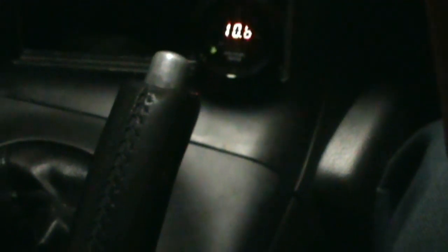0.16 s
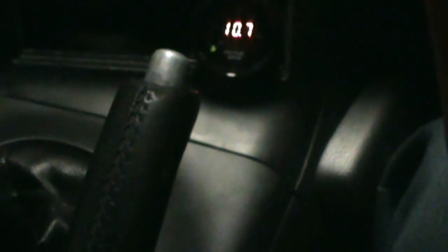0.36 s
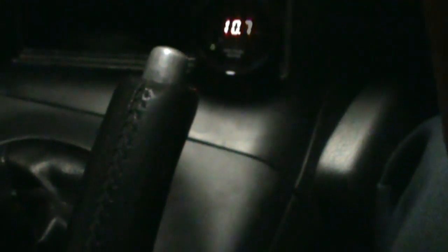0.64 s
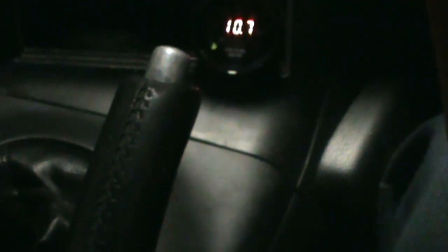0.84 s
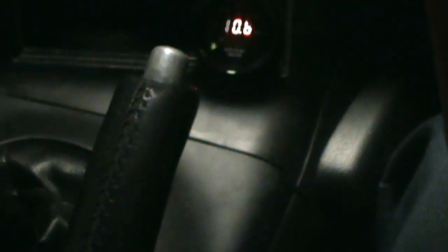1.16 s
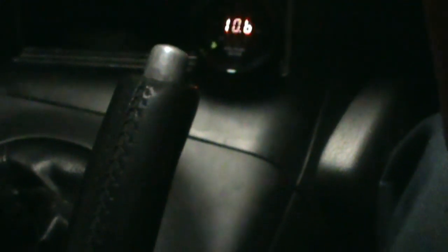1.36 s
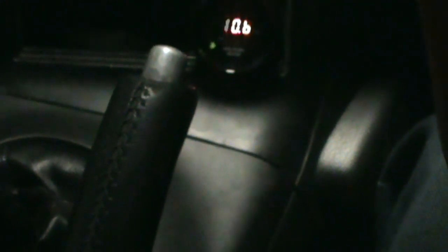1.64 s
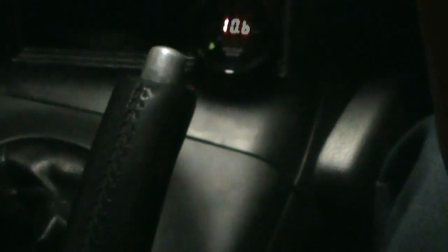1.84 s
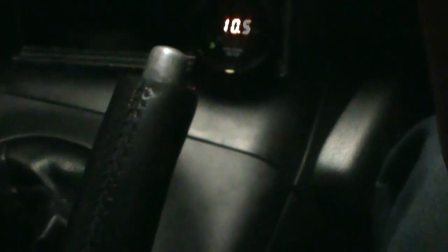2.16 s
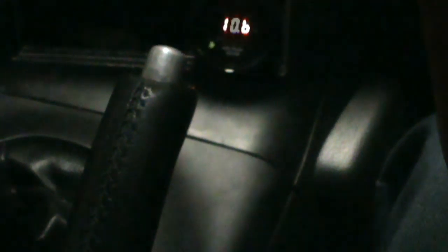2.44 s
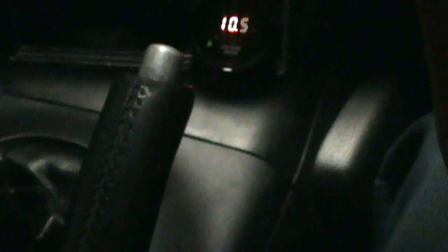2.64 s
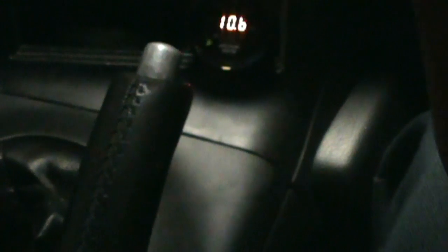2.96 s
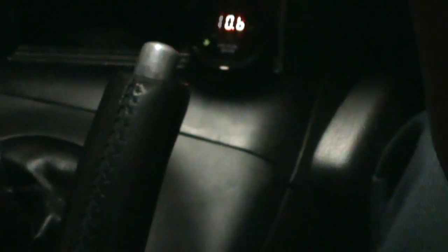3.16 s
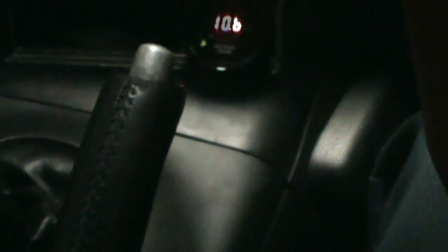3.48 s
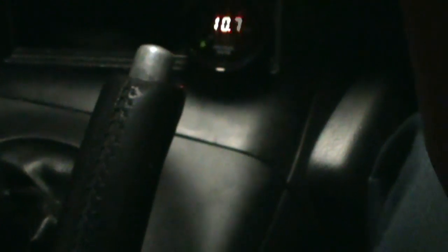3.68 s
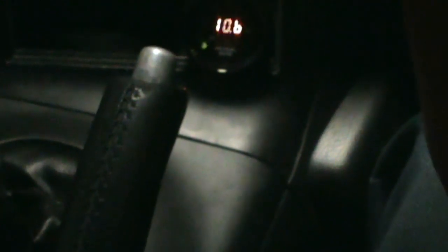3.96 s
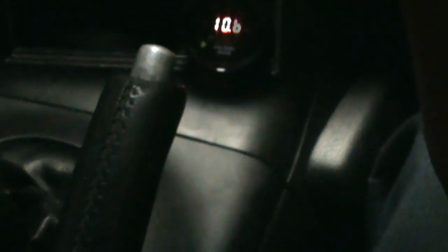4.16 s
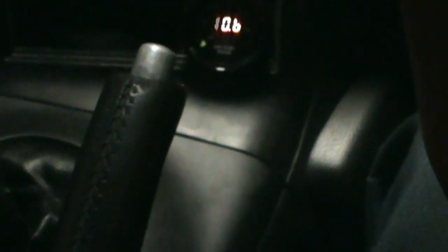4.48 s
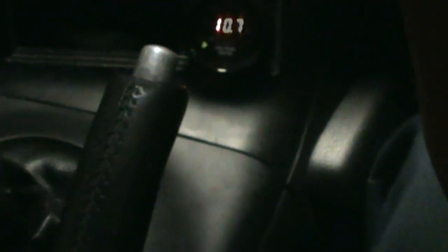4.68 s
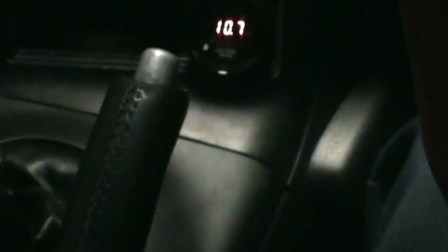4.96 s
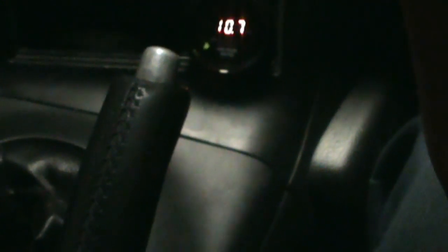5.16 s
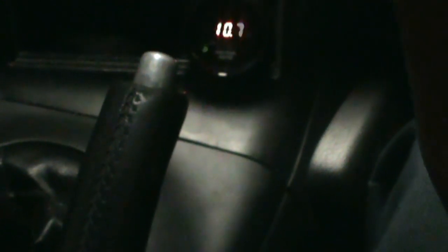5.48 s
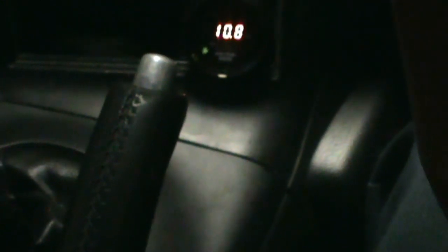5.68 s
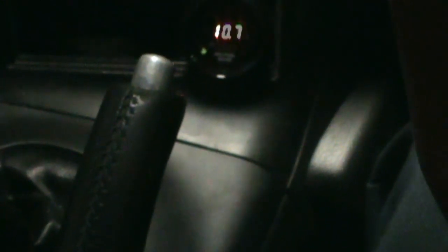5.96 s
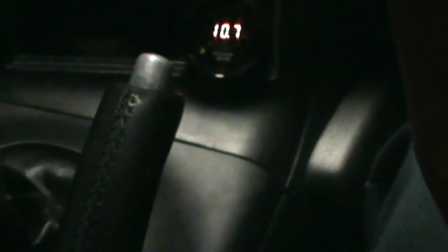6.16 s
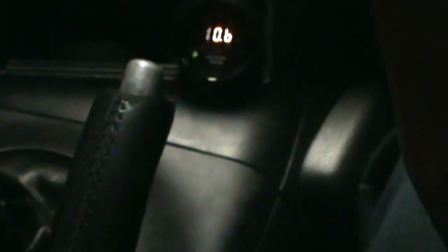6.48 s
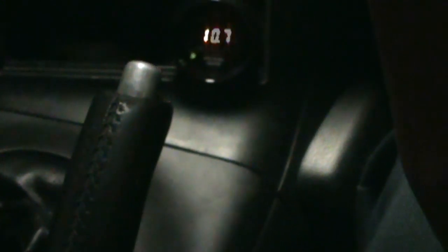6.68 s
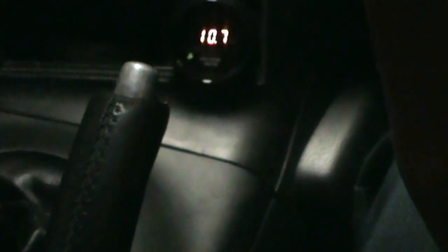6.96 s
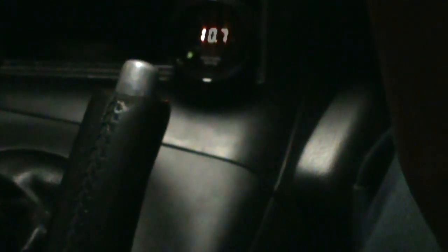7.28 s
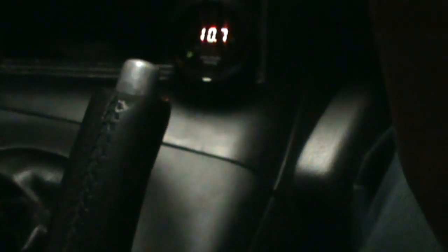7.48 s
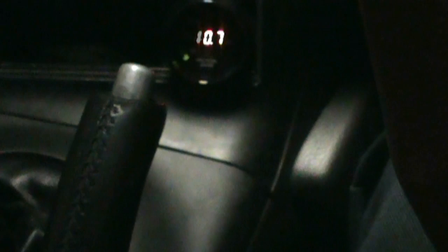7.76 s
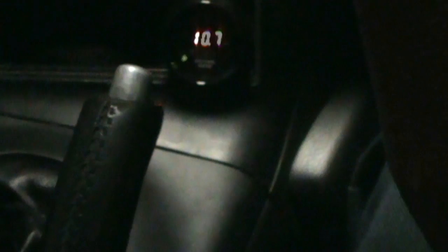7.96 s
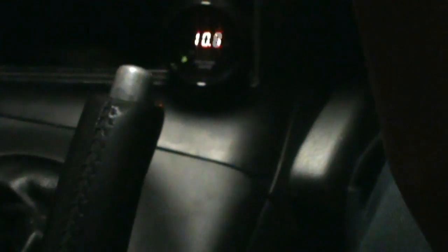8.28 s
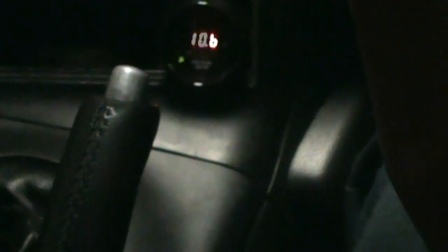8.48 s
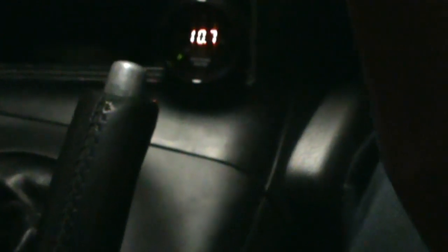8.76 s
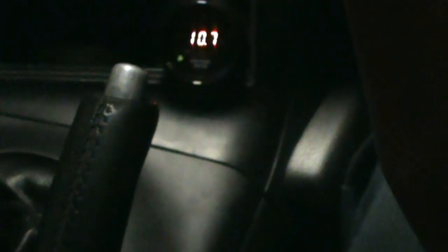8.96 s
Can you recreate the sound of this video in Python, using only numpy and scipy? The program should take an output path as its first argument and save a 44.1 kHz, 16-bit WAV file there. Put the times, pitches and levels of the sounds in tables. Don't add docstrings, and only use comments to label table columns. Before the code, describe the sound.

Inside a parked car, a low booming idle throbs roughly and continuously, with soft air noise, trim buzz and small irregular plastic clicks.

```python
import sys
import numpy as np
from scipy import signal
from scipy.fft import rfft, irfft, next_fast_len
from scipy.io import wavfile
from scipy.ndimage import uniform_filter1d, map_coordinates

SR = 44100
rng = np.random.default_rng(int(sys.argv[2]) if len(sys.argv) > 2 else 0)


def boost_factor(decibels):
    exponent = np.asarray(decibels, float) / 20
    return 10 ** exponent


def int16_out(signal):
    q = np.round(np.clip(np.atleast_2d(signal).T, -1, 1) * 32767)
    wavfile.write(sys.argv[1], SR, q.astype(np.int16))


N = 402191
PAD = next_fast_len(N + 16384)
HZ = np.fft.rfftfreq(PAD, 1 / SR)

# (frequency [Hz], level [dB per Hz])
RUSH_SPECTRUM = [(200, -37), (330, 2.5), (450, 1.5), (560, -5), (850, -5.5), (1090, -14), (1300, -12.5),
                 (1550, -18.5), (2000, -19), (2300, -25.5), (3420, -27), (7500, -31), (12000, -33.5),
                 (15700, -40)]
# (frequency [Hz], width [Hz], level over the rush [dB])
TRIM_PANELS = [(1030, 40, 3), (1200, 20, 4), (1270, 40, 3), (1440, 20, 6), (1680, 50, 3), (1943, 18, 6),
               (2140, 50, 3), (2443, 40, 4), (2660, 25, 5), (2706, 22, 7), (2755, 25, 6), (2905, 20, 4),
               (3050, 60, 4), (4135, 15, 5), (4697, 30, 8), (4965, 25, 6), (6330, 30, 4), (6960, 200, 3),
               (10900, 300, 2)]
# (frequency [Hz], left over right [dB])
CABIN_PAN = [(300, 1.6), (1300, 2), (4400, .5), (15000, 0.22)]
# (frequency [Hz], left lead [rad])
CABIN_LEAD = [(300, 0.81), (950, 0.29), (1300, 0.16), (15000, 0.33)]


def unit(x):
    return x / np.sqrt(np.mean(x ** 2) + 1e-20)


def along(points, hz):
    f, v = np.transpose(points)
    return np.interp(np.log(hz + 1), np.log(f + 1), v)


def causal(db):
    ceps = irfft(np.log(boost_factor(db) + 1e-6), PAD)
    ceps[1:PAD // 2] *= 2
    ceps[PAD // 2 + 1:] = 0
    return np.exp(rfft(ceps))


def wobble(rate):
    return map_coordinates(rng.standard_normal(int(N * rate / SR) + 4), [np.arange(N) * rate / SR])


def ports(pair, colour, alike, pan, lead):
    turn = np.arccos(np.clip(alike, -1, 1)) / 2
    shared, opposed = rfft(pair, PAD) * colour * [np.cos(turn) + 0 * HZ, np.sin(turn) + 0 * HZ]
    tilt = boost_factor(along(pan, HZ) / 2) * np.exp(.5j * along(lead, HZ))
    left, right = (shared + opposed) * tilt, (shared - opposed) / tilt
    return unit(irfft(np.array([left, right]), PAD)[:, :N])


def shaft():
    # (time [s], shaft
    speed_path = [(0, 24.65), (1.25, 24.68), (1.42, 24.62), (1.82, 24.99), (2.12, 24.71), (3.62, 24.7),
                  (3.72, 24.85), (4.08, 24.88), (4.85, 24.63), (6.9, 24.83), (7.06, 25.06), (7.35, 24.79),
                  (8.41, 24.99), (8.76, 24.77), (9.12, 24.83)]
    # (time [s], speed change [Hz])
    stumbles = [
        (0.42, -0.22),
        (0.79, 0.17),
        (1.28, -0.14),
        (2.56, -0.21),
        (2.87, 0.15),
        (3.32, -0.27),
        (5.02, -0.1),
        (5.37, 0.08),
        (5.7, -0.3),
    ]
    stumble_s, idle_hz, start_turn = 0.063, 24.73, -0.24
    t = np.arange(N) / SR
    hz = np.interp(t, *np.transpose(speed_path))
    for s, change_hz in stumbles:
        u = np.maximum(t - s, 0) / stumble_s
        hz = hz + change_hz * u * np.exp(1 - u)
    hz = hz - 0.007
    turns = start_turn + np.cumsum(hz + 0.03 * wobble(12)) / SR
    return turns, uniform_filter1d(hz, size=6000) - idle_hz


def hum(turns, over_hz, orders, flanks, cycle_hz, odd_lag):
    # (frequency [Hz], width [Hz])
    chambers = [(121, 53.6), (158, 48.5), (391, 10.2)]
    out = np.zeros((2, N))
    swells = {}
    for k, left, right, away in flanks:
        swells[k] = np.outer([left, right], over_hz) + away * np.abs(over_hz)
    for k, left_db, right_db, lead in orders:
        hz = k * cycle_hz
        left_swell, right_swell = swells.get(k, (0, 0))
        lag = sum(2 * np.arctan2(hz * w, c * c - hz * hz) for c, w in chambers)
        lag += odd_lag * (k % 2)
        angle = 2 * np.pi * k * turns - lag
        out[0] -= boost_factor(left_db + left_swell) * np.cos(angle + lead)
        out[1] -= boost_factor(right_db + right_swell) * np.cos(angle)
    return np.sqrt(2) * out


def engine_hum(turns, over_hz):
    # (multiple, left level [dB], right level [dB], left lead [rad])
    orders = [(1, -37.7, -37.4, -0.1), (2, -26.1, -23.0, 0.1), (3, -38.1, -36.9, 0.2),
              (4, -23.6, -14.3, 0.5), (5, -34.0, -28.4, 0.8), (6, -40.3, -29.0, -0.8),
              (7, -37.2, -37.0, 2.0), (8, -25.4, -24.1, 1.1), (9, -32.0, -34.6, 0.7),
              (10, -20.8, -19.9, 0.8), (11, -36.8, -34.6, 0.9), (12, -30.4, -33.4, 0.7),
              (13, -40.0, -45.1, 1.7), (14, -41.9, -43.0, 1.8), (15, -51.7, -49.8, 1.5),
              (16, -41.0, -44.1, 0.3), (17, -50.6, -49.0, 1.3), (18, -50.6, -51.2, -0.1),
              (21, -62.0, -56.3, 1.3), (22, -61.8, -57.7, 0.9), (24, -51.4, -47.6, 0.2),
              (25, -57.0, -56.9, 1.1), (26, -58.2, -56.3, 1.8), (27, -58.4, -57.5, 0.5),
              (28, -63.6, -60.7, 1.1), (29, -57.4, -60.2, 0.6), (30, -61.0, -64.0, 0.9),
              (32, -60.1, -63.6, 1.1), (35, -59.9, -62.7, 0.4), (36, -62.0, -65.9, 0.6)]
    # (multiple, left slope [dB per Hz], right slope [dB per Hz], rise away from idle [dB per Hz])
    flanks = [(2, 1.3, 2, 0), (4, 9, 5.5, 0), (5, 2.7, 1.7, 0), (6, -12, 4, 14), (7, 3, -15, 0),
              (8, -12, -8, 0), (9, 4, 7, 0), (10, -1.4, -2, 0), (11, -12, -4, 0), (12, 3, 9, 0),
              (14, -9, -10, 0), (15, -30, -5, 0), (16, -11, -19, 0), (24, -8, -9, 0)]
    return hum(turns, over_hz, orders, flanks, 24.554, odd_lag=1.22)


def burble(turns, over_hz):
    # (frequency [Hz], level [dB per Hz])
    thump = [(10, -13), (37, -11), (61, 2), (86, 1.5), (136, 5), (165, 8), (235, 4), (284, -11.5), (310, 7),
             (360, -19.5), (460, -10), (560, -26), (800, -37), (1500, -59)]
    # (frequency [Hz], left over right [dB])
    thump_pan = [(40, -3), (61, -27), (136, -9), (210, 12.5), (260, -27.5), (310, 1.5), (600, -4)]
    # (frequency [Hz], left lead [rad])
    thump_lead = [(40, .1), (110, 0.7), (200, 1.58), (300, 0.64), (900, 0.73)]
    faces = [1.5, -0.45, -1, 0.5, 0.35, -0.3]
    uneven_db_per_hz = 15
    fired = np.flatnonzero(np.diff(np.floor(2 * turns)))
    unevenness_db = uneven_db_per_hz * np.abs(over_hz[fired, None]) * [1, 1, 0, 1]
    size = rng.standard_normal((len(fired), 4)) * boost_factor(unevenness_db)
    pair = 0.0041 * rng.standard_normal((2, N))
    pair[:, fired] += (size[:, :2] * boost_factor(0.5 * size[:, 2:3])).T
    pair[0, fired] += np.resize(faces, len(fired))
    pair[0, np.minimum(fired + 310, N - 1)] += 0.84 * size[:, 3]
    return boost_factor(-31.0) * ports(pair, causal(along(thump, HZ)), 0.73, thump_pan, thump_lead)


def pump_hum(turns, over_hz):
    # (multiple, left level [dB], right level [dB], left lead [rad])
    orders = [(1, -44.1, -40.4, 0.1), (2, -45.6, -46.4, 0.9), (4, -39.9, -35.0, -0.2),
              (5, -48.3, -48.5, 0.2), (7, -52.2, -49.6, 0.9), (8, -57.1, -64.3, 1.3),
              (10, -62.2, -70.6, 2.4), (11, -47.8, -54.7, 0.6), (14, -65.9, -66.3, 0.1),
              (17, -70.6, -82.0, 0.4), (19, -68.4, -68.1, 0.3)]
    # (multiple, left slope [dB per Hz], right slope [dB per Hz], rise away from idle [dB per Hz])
    flanks = [(1, -16, -17, 0), (2, -8, -3, 0), (5, 10, 6, 0), (11, 1, -21, 0)]
    strokes = turns * 8 / 3
    return hum(strokes + 0.34, over_hz, orders, flanks, 62, odd_lag=0.75)


def rush(turns):
    # (time [s], level [dB])
    air = [(0.0, -59.5), (1.57, -60.5), (1.67, -60), (5.99, -60.5), (9.12, -61)]
    # (frequency [Hz], likeness [0-1])
    likeness = [(300, 1), (800, 0.4), (1500, 0.71), (4000, 0.55), (15000, 0.57)]
    z = signal.stft(rng.standard_normal((2, N)), nperseg=512)[2]
    field = uniform_filter1d(rng.standard_normal(z.shape[1:]), size=5, axis=0)
    field = uniform_filter1d(field, size=8, axis=1)
    pair = signal.istft(z * boost_factor(0.56 * unit(field)), nperseg=512)[1][:, :N]
    firing_db = 0.9 * np.cos(4 * np.pi * turns + 2.0)
    rotor_db = 0.59 * np.cos(2 * np.pi * turns + 1.4)
    beat_db = firing_db + rotor_db + 0.32 * wobble(14) + 0.6 * wobble(40)
    buzz_db = sum(db / (1 + (2 * (HZ - hz) / width) ** 2) for hz, width, db in TRIM_PANELS)
    ripple = map_coordinates(rng.standard_normal(1400), [HZ / 18])
    modes_db = 1.26 * ripple / (1 + HZ / 9000)
    air_db = np.interp(np.arange(N) / SR, *np.transpose(air))
    colour = boost_factor(along(RUSH_SPECTRUM, HZ) + buzz_db + modes_db)
    noise = ports(pair * boost_factor(beat_db), colour, along(likeness, HZ), CABIN_PAN, CABIN_LEAD)
    return boost_factor(air_db + 21.5) * noise


def rattle(turns):
    fired = np.flatnonzero(np.diff(np.floor(2 * turns + .6)))
    chance = rng.standard_normal((len(fired), 3))
    tapped = np.clip(fired + (1.5 * chance[:, 0]).astype(int), 0, N - 1)
    tap_db = 2.5 * chance[:, 1:].T + 3 * wobble(7)[fired]
    taps = np.zeros((2, N))
    taps[:, tapped] = boost_factor(np.minimum(tap_db, 6))
    panels = 0
    for hz, w, db in TRIM_PANELS:
        resonance = 1j * HZ * w / (hz * hz - HZ * HZ + 1j * HZ * w)
        panels = panels + boost_factor(along(RUSH_SPECTRUM, hz) + db) * resonance
    return boost_factor(-58) * ports(taps, panels, 0.87, CABIN_PAN, CABIN_LEAD)


def whine():
    # (frequency [Hz], level [dB rms])
    tones = [(9805, -83), (11834, -88), (15675, -90), (15734, -79)]
    t = np.arange(N) / SR
    return sum(np.sqrt(2) * boost_factor(db) * np.sin(2 * np.pi * hz * t) for hz, db in tones)


def ring(t, hz, t60):
    return boost_factor(-60 * t / t60) * np.sin(2 * np.pi * hz * t)


def crackle(t, lo_hz, hi_hz):
    band = signal.butter(2, [lo_hz, hi_hz], "band", fs=SR, output="sos")
    noise = signal.sosfilt(band, rng.standard_normal(len(t)))
    return unit(noise) / (1 + (t / 0.0062) ** 4)


def creaks():
    # (time [s], knock peak [dB], knock pitch [Hz], crackle over the knock [dB], low panel over the knock [dB])
    slips = [(0.583, -49, 2600, -7, -8), (1.0194, -48, 1540, -13, -5), (1.4096, -43, 1420, -11, 0),
             (1.712, -38.5, 1390, -11, -8), (2.65, -43, 1420, -28, -15), (3.385, -39, 1420, -28, -15),
             (2.025, -46, 1640, -10, -7), (2.2186, -47, 1430, -6, 1), (2.365, -35, 1410, -19, -5),
             (4.285, -38, 1460, -10, -7), (4.304, -36.5, 1400, -16, -9), (5.1307, -40, 1430, -7, -7),
             (5.4103, -41, 1410, -7.5, -2), (5.632, -32, 1630, -15, -9), (5.874, -32, 1470, -10.5, -14),
             (6.097, -36.5, 1400, -15, -11), (6.3126, -34.5, 1410, -17, -14), (6.983, -41, 1510, -19, -9),
             (7.116, -50.5, 1500, 0, -9), (7.1895, -30.5, 1710, -25, -10), (7.604, -35, 2080, -26, 2),
             (8.072, -45, 1800, -14, -10)]
    treble_db, snap_db = -5, 6
    out, t = np.zeros(N + SR), np.arange(2000) / SR
    for s, db, hz, crackle_db, body_db in slips:
        knock = ring(t, hz, 0.023) + 0.35 * ring(t, 2120, 0.02)
        knock += boost_factor(body_db) * ring(t, 1130, .03) + 0.22 * crackle(t, 1000, 3000)
        fizz = crackle(t, 3500, 7800) + boost_factor(treble_db) * crackle(t, 9000, 13000)
        fizz *= boost_factor(crackle_db - 3) * (1 + boost_factor(snap_db - 60 * t / 0.0046))
        out[round(s * SR):][:len(t)] += boost_factor(db - 2.1) * (knock + fizz)
    return out


def pings():
    # (time [s], peak level [dB], ring pitch [Hz])
    hits = [(0.584, -35.5, 5900), (1.0194, -46, 5000), (2.0258, -42, 4700), (4.2847, -48, 8140),
            (4.655, -45, 5570), (4.698, -45, 4270), (5.1307, -35.5, 6440), (5.411, -38, 6330),
            (6.9907, -43, 3300), (7.1204, -46, 6400), (7.1905, -52, 5950), (8.5494, -47, 7130)]
    out, t = np.zeros(N + SR), np.arange(2000) / SR
    for s, db, hz in hits:
        ping = ring(t, hz, 0.0086) + .6 * ring(t, hz * 1.04, 0.0091) + .5 * ring(t, hz * 0.73, 0.0054)
        out[round(s * SR):][:len(t)] += boost_factor(db - 1.5) * ping
    return out


def cabin_walls(source):
    walls = np.zeros((2, 900))
    walls[:, 0] = boost_factor([1.2, -1.2])
    t = np.arange(860) / SR
    walls[:, 40:] = 0.077 * rng.standard_normal((2, 860)) * boost_factor(-60 * t / 0.034)
    return signal.fftconvolve(source[None, :N], walls, axes=1)[:, :N]


def scene():
    turns, over_hz = shaft()
    engine = engine_hum(turns, over_hz) + burble(turns, over_hz)
    machinery = engine + pump_hum(turns, over_hz)
    steady = machinery + rush(turns) + rattle(turns) + whine()
    return steady + cabin_walls(creaks() + pings())


def top_cut(x):
    return signal.sosfilt(signal.butter(12, 15940, fs=SR, output="sos"), x)


def record(dry):
    top_hz = 15790
    mix = irfft(rfft(dry, PAD) * (HZ < top_hz), PAD)[:, :N]
    return top_cut(mix)


dry = scene()
out = record(dry)
int16_out(out)
```